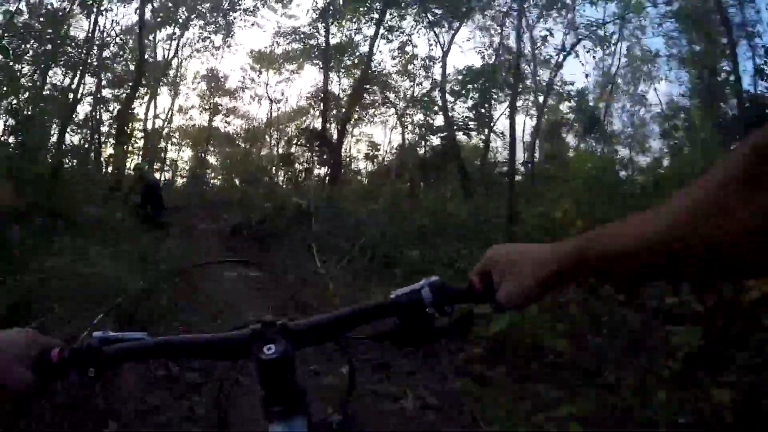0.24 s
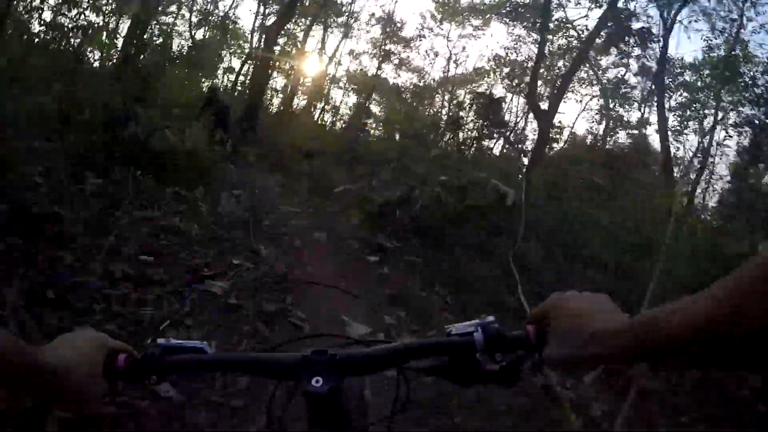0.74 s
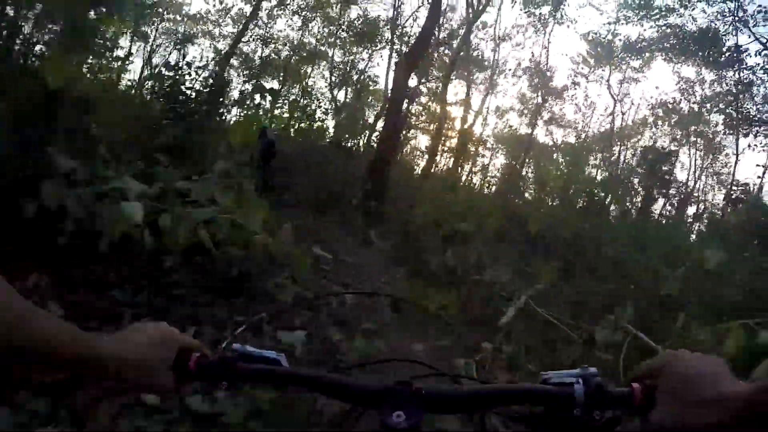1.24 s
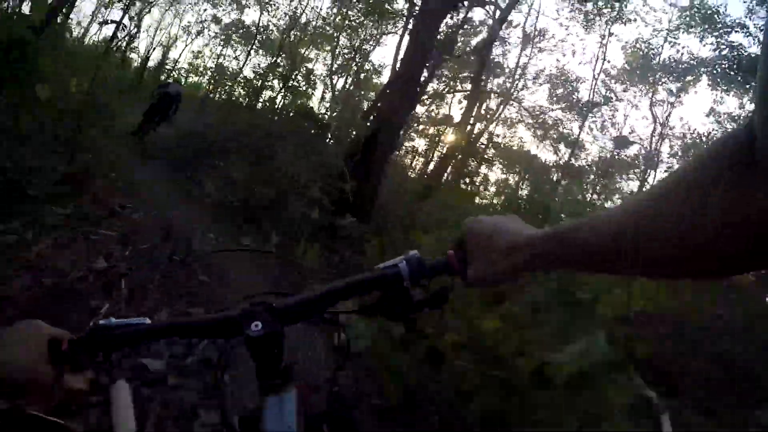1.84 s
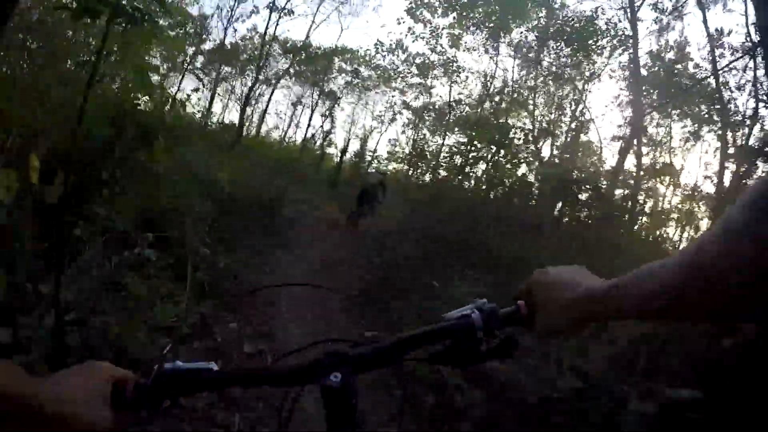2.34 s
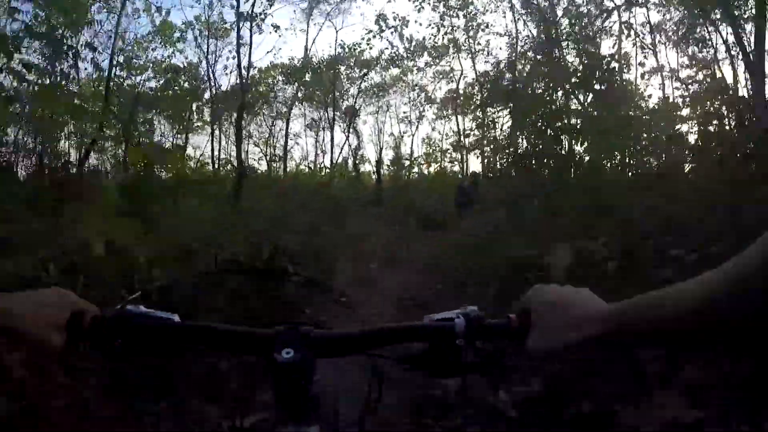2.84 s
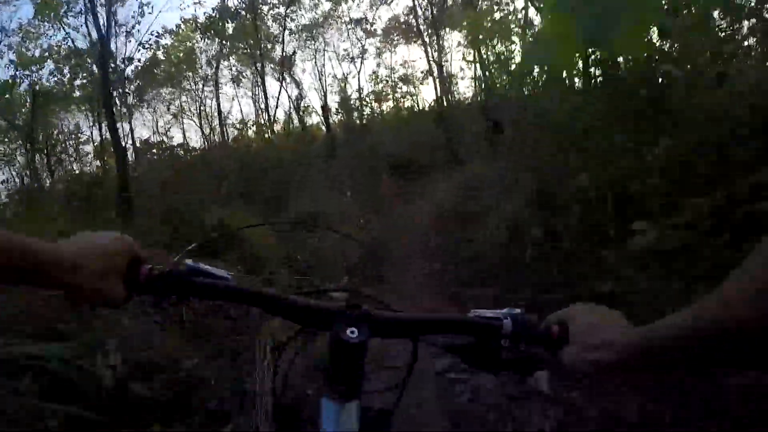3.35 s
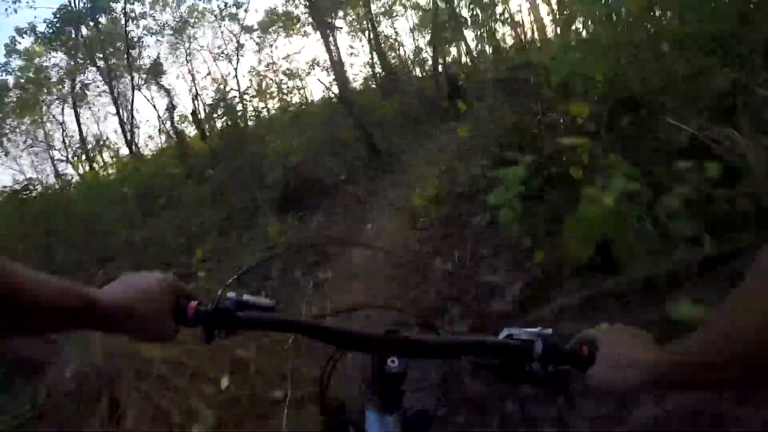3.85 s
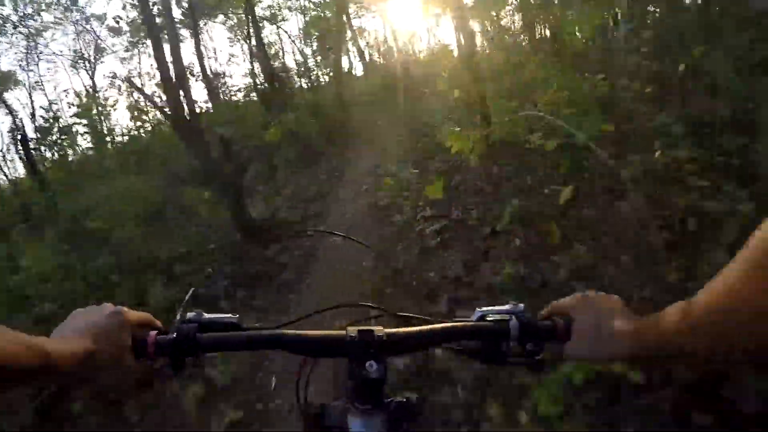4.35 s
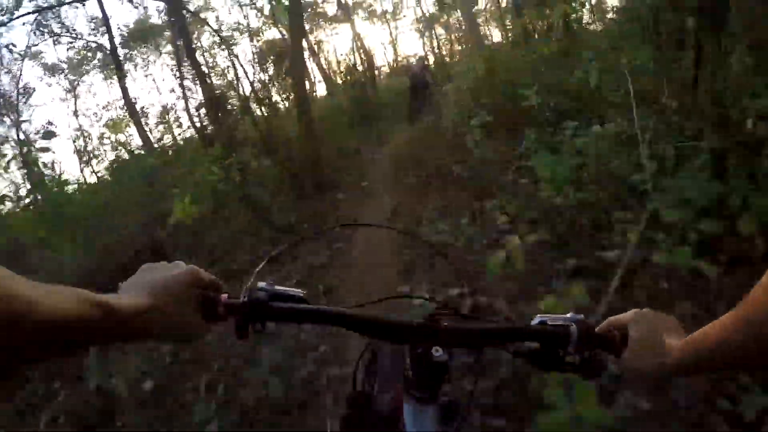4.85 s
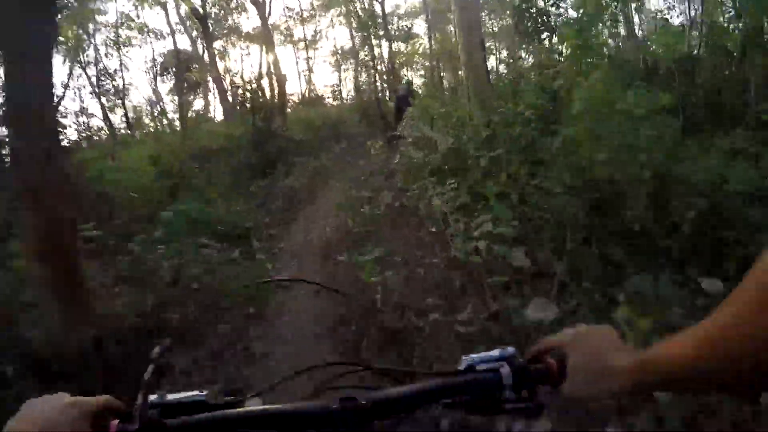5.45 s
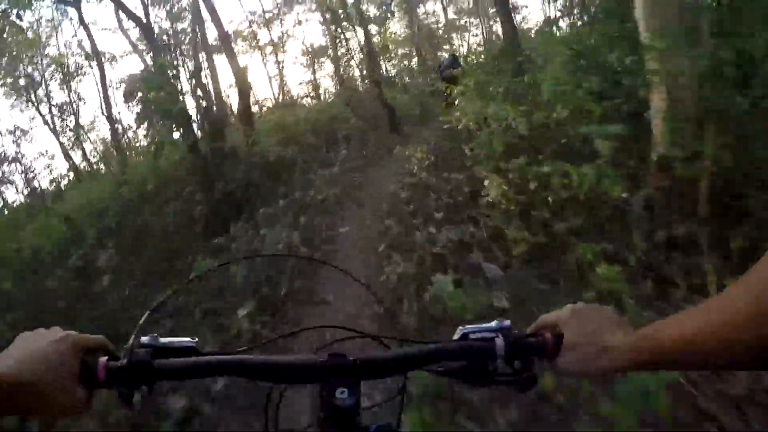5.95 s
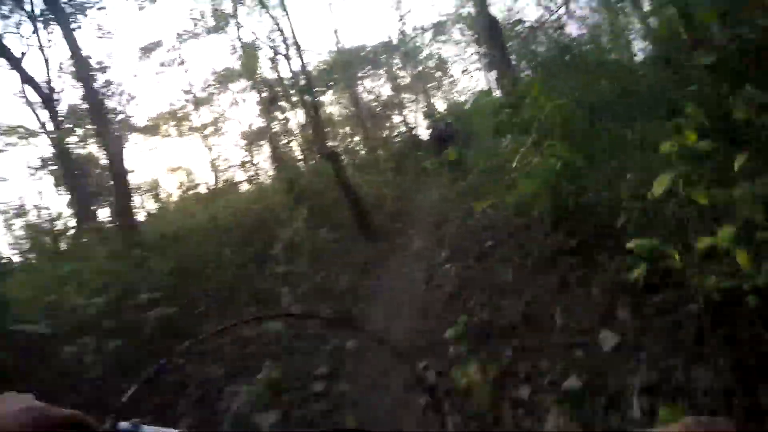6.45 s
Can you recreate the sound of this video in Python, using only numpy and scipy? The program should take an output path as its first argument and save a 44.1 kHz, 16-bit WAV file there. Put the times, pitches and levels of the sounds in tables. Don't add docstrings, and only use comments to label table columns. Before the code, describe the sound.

Close, boxed-in sound of a bike bouncing along a dirt track in open woodland. A shuddering sub-bass rumble runs throughout, broken by short lulls and big low jolts. Over it come dull mount knocks, chain and stone clacks, small taps, and crackly bursts of leaves and twigs, densest before two seconds and near four. Fainter dirt crunch, chain whir and a thin rush of air sit behind.

```python
import sys
import numpy as np
from scipy import signal
from scipy.fft import irfft
from scipy.io import wavfile
from scipy.ndimage import uniform_filter1d

SR = 44100
rng = np.random.default_rng(int(sys.argv[2]) if len(sys.argv) > 2 else 0)


def inscribe(sig):
    pcm = np.round(np.clip(np.atleast_2d(sig).T, -1, 1) * 32767)
    wavfile.write(sys.argv[1], SR, pcm.astype(np.int16))


def nominal_scale(level):
    x = np.asarray(level, float) / 20
    return 10 ** x


N = 295029

# centre_hz, width_hz, lift_db
CASE_MODES = [(507, 440, -1), (719, 75, 0.5), (1333, 118, 3), (1910, 300, 6.5), (2634, 440, 4.5),
              (3350, 390, 4), (3908, 205, 4.5), (4970, 220, -2), (7450, 670, 5.5), (9400, 280, 4),
              (10300, 190, 1.5), (13400, 520, 4.5), (2264, 428, -7.5), (6100, 310, 0.5)]


def evened(x):
    return x / np.sqrt(np.mean(x ** 2) + 1e-20)


def curves(rows):
    s, *columns = np.transpose(rows)
    return [np.interp(np.arange(N) / SR, s, column) for column in columns]


def humps(rows):
    t = np.arange(N) / SR
    return np.max([db * np.maximum(1 - abs(t - s) / half, 0) for s, db, half in rows], axis=0)


def read(points, hz):
    f, db = np.transpose(points)
    return np.interp(np.log(hz + 1), np.log(f + 1), db, -90, -90)


def causal(db):
    log_gain = np.log(nominal_scale(np.concatenate([db, db[-2:0:-1]])))
    minimum_phase = np.exp(np.conj(signal.hilbert(log_gain)))
    return irfft(minimum_phase[:len(db)])[:len(db)]


def coloured(x, points, size=4096):
    taps = causal(read(points, np.fft.rfftfreq(size, 1 / SR)))
    return evened(signal.oaconvolve(x, taps)[:len(x)])


def band(x, lo_hz, hi_hz):
    sos = signal.butter(3, [lo_hz, hi_hz], "band", fs=SR, output="sos")
    return evened(signal.sosfilt(sos, x))


def flicker(per_s, depth_db):
    steps = rng.standard_normal(4000)
    return nominal_scale(depth_db * np.interp(np.arange(N) / SR * per_s, np.arange(4000), steps))


def grit(per_s, grain_s, bed):
    happens = rng.random(N) < per_s / SR
    size = nominal_scale(4.5 * np.minimum(rng.exponential(1, N), 3)) * happens
    puffs = signal.lfilter([1], [1, -np.exp(-1 / (grain_s * SR))], size)
    return (bed + evened(puffs)) * rng.standard_normal(N)


def patchy(x, depth_db):
    z = signal.stft(x, nperseg=256, noverlap=192)[2]
    patches = uniform_filter1d(rng.standard_normal(z.shape), size=3, axis=0)
    patches = uniform_filter1d(patches, size=10, axis=1)
    return evened(signal.istft(z * nominal_scale(depth_db * evened(patches)), nperseg=256, noverlap=192)[1][:N])


def add(mix, s, sound):
    part = mix[round(s * SR):][:len(sound)]
    part += sound[:len(part)]


def shaking():
    # frequency_hz, level_db (per Hz)
    rumble_spectrum = [(4.7, -18.5), (8.0, 4), (22, 7), (36, -2.5), (50, -17.5), (120, -25), (160, -28),
                       (260, -120)]
    # frequency_hz, level_db (per Hz)
    buffet_spectrum = [(29, -30), (50, -1), (226, -23.5), (372, -34), (600, -39), (780, -81), (1320, -120)]
    # centre_s, depth_db, half_length_s
    lulls = [(0.0, 35, 0.077), (0.11, 19.5, 0.074), (0.39, 14, 0.21), (0.89, 18, 0.053), (1.25, 9, 0.29),
             (1.49, 11, 0.044), (2.03, 18, 0.085), (0.97, 4, 0.054), (2.12, 12, .08), (2.22, 11, 0.15),
             (2.4, 11, 0.07), (2.6, 6, 0.18), (3.06, 8, 0.067), (3.2, 9, 0.067), (3.48, 4, 0.07),
             (4.04, 13, 0.073), (4.4, 5.5, 0.76), (4.77, 11.5, 0.23), (5.0, 11.5, 0.092), (5.37, 7, 0.23),
             (6.0, 24, 0.043), (6.17, 13.5, 0.16), (6.28, 6, 0.065), (6.45, 6, 0.35)]
    # centre_s, lift_db, half_length_s
    ruts = [(0.0, 14, 0.035), (0.27, 7, 0.072), (0.61, 9.5, 0.096), (0.8, 10, 0.074), (1.4, 7, 0.15),
            (1.79, 15, 0.062), (1.93, 4, 0.048), (2.45, 19, 0.071), (2.62, 15, 0.071), (2.8, 10.5, 0.15),
            (3.23, 7, 0.033), (3.35, 11, 0.048), (3.58, 12, 0.13), (3.88, 17, 0.071), (4.08, 12.5, 0.14),
            (4.58, 8, 0.36), (4.81, 9.5, 0.13), (5.2, 7, 0.51), (5.52, 6, 0.18), (6.17, 10, 0.069),
            (6.32, 5, 0.044), (6.45, 8, .12), (6.62, 9.5, 0.1)]
    deep = coloured(rng.standard_normal(N), rumble_spectrum, size=32768)
    deep /= np.sqrt(uniform_filter1d(deep ** 2, 5000) + 0.039)
    buffet = coloured(rng.standard_normal(N) * flicker(25, 4.43), buffet_spectrum, size=16384)
    sink_db = humps(lulls)
    rumble_db = -23.5 - sink_db
    buffet_db = -43.5 + humps(ruts) - 0.15 * sink_db
    return nominal_scale(rumble_db) * evened(deep) + nominal_scale(buffet_db) * buffet


def pedalling():
    # start_s, end_s, whir_db, run_up_s, run_down_s
    pedals = [
        (0.46, 2.27, -54, .04, 0.21),
        (3.43, 6.03, -52.5, 0.24, 0.06),
    ]
    t, coast_db = np.arange(N) / SR, -75
    spells = [np.interp(t, [start - up, start, end, end + down], [coast_db, db, db, coast_db])
              for start, end, db, up, down in pedals]
    return np.max(spells, axis=0)


def rolling():
    # time_s, dirt_db, leaves_db
    ride = [(0.0, -52.5, -50), (0.39, -57, -54), (0.67, -57, -47), (0.9, -43.5, -47.5),
            (1.17, -54.5, -55.5), (1.43, -50.5, -43.5), (1.77, -51, -37), (2.2, -55, -48), (2.46, -49, -46),
            (2.6, -53, -51), (3.13, -51.5, -53), (3.35, -46.5, -48.5), (3.7, -47, -38.5), (4.1, -51, -44.5),
            (5.22, -51.5, -45), (5.85, -55.5, -48.5), (6.22, -54, -49), (6.6, -50.5, -46.5)]
    # frequency_hz, level_db
    dirt_spectrum = [(250, 3.5), (400, -6.5), (800, -1), (1500, 0.5), (2100, -1.5), (2600, -7), (5000, -36)]
    # frequency_hz, level_db
    leaf_spectrum = [(1200, -22), (1800, 2.5), (2500, 3), (4150, 8), (4600, -25), (6500, -10),
                     (10000, -12.5), (15300, -27)]
    # frequency_hz, level_db
    whir_spectrum = [(1900, -41), (2500, 7), (4200, 3.5), (4900, -7.5), (6100, -12.5), (7400, -11.5),
                     (8400, -11), (10400, -6.5), (13300, -10.5), (15300, -6.5)]
    dirt_db, leaves_db = curves(ride)
    dirt = patchy(coloured(grit(200, 0.003, 2.6) * flicker(30, 1.5), dirt_spectrum), 2.4)
    leaves = patchy(coloured(grit(350, 0.002, 2.0) * flicker(40, 1.6), leaf_spectrum), 2.3)
    whir = coloured(grit(830, 0.00094, 2.0) * flicker(13, 0.99), whir_spectrum)
    whir_db = pedalling() + 0.088 * (leaves_db - leaves_db.mean())
    return nominal_scale(dirt_db + 0.5) * dirt + nominal_scale(leaves_db - 7.5) * leaves + nominal_scale(whir_db) * whir


def rushing_air():
    # frequency_hz, level_db
    air_spectrum = [(3000, 5), (5000, 6), (9000, -11), (12500, -3.5), (15200, -20)]
    return nominal_scale(-66) * coloured(rng.standard_normal(N), air_spectrum)


def brushes():
    # start_s, peak_db, dull_db (under the peak), length_s
    soft_passes = [(2.72, -27.5, -22, 0.01), (0.725, -31, -21, .0075), (1.529, -28.5, -15, 0.025),
                   (1.583, -25.5, -15, 0.022), (1.7456, -27, -9.5, 0.08), (1.837, -29, -15.5, 0.033),
                   (1.944, -26.5, -10.5, 0.022), (2.03, -23, -26, 0.033), (5.265, -47.5, 7, 0.026),
                   (3.6267, -24, -33, 0.039), (3.687, -23.5, -14, 0.02), (3.751, -28.5, -17, 0.023),
                   (3.8, -24, -18, 0.04), (3.865, -20.5, -31, 0.018), (3.8957, -21.5, -31, 0.034),
                   (3.959, -23.5, -28, 0.041), (4.644, -41, 6, 0.0068), (4.7014, -20, -19, 0.011),
                   (4.73, -20.5, -19.5, 0.029), (5.0955, -27, -27, 0.016), (5.142, -31.5, -30, 0.035),
                   (5.868, -46, 6, 0.0074), (6.433, -51, 10, 0.18), (0.874, -46, 5.5, 0.095),
                   (1.771, -28.5, -12, 0.072), (6.16, -41.5, 2, 0.067), (6.644, -50, -12, 0.033)]
    # start_s, peak_db, dull_db (under the peak), length_s
    twig_sweeps = [(0.1239, -33.5, -18, 0.047), (0.337, -36, -12, 0.044), (1.112, -32.5, -18, 0.07),
                   (1.146, -35, -9, 0.04), (1.993, -32, -7.5, 0.025), (2.307, -21.5, -13, 0.014),
                   (2.419, -25, -5.5, 0.014), (5.067, -15.5, -19, .013), (5.324, -22.5, -19, 0.0067),
                   (3.4269, -27, -15, 0.074), (3.4486, -22, -13, 0.034), (5.339, -15.5, -21.5, 0.0077),
                   (6.136, -43, -7, 0.021), (6.552, -18.5, -37, 0.0084), (6.563, -25.5, -25, 0.022),
                   (6.584, -25.5, -35, 0.022)]
    out, t = np.zeros(N), np.arange(6000) / SR
    rows = [(*r, -19) for r in soft_passes] + [(*r, -12) for r in twig_sweeps]
    noise = rng.standard_normal((len(rows), 4, len(t)))
    dull = band(noise[:, 0], 850, 2520)
    mid = band(noise[:, 1], 2890, 4710)
    fizz = band(noise[:, 2], 3200, 12800)
    clumps = nominal_scale(4.0 * evened(uniform_filter1d(noise[:, 3], 130)))
    for (s, db, dull_db, length, fizz_db), d, m, f, clump in zip(rows, dull, mid, fizz, clumps):
        hold = (1 - np.exp(-t / 0.00061)) * np.exp(-(t / length) ** 3)
        hold *= 1 + 0.46 * np.exp(-t / 0.0027)
        crackle = m + nominal_scale(dull_db + 11.0) * d + nominal_scale(fizz_db + 3) * f
        add(out, s, nominal_scale(db - 19) * hold * clump * crackle)
    return out


def blows():
    # time_s, peak_db, centre_hz, crack_db (under the peak)
    clacks = [(0.146, -23.5, 4240, -11), (1.0258, -10.5, 1640, -21.5), (1.196, -16.5, 1570, -16.5),
              (1.236, -25.5, 1870, -41), (1.38, -23, 980, -14), (1.793, -30, 3410, -22),
              (2.299, -6, 1910, -17), (2.317, -29, 3580, -18), (2.424, -13, 1200, -18),
              (3.591, -19.5, 1770, -20), (3.608, -21, 1900, -36), (3.728, -15.5, 990, -32),
              (4.068, -17, 1210, -30), (4.076, -12, 1860, -33), (4.257, -26.5, 1600, -29),
              (4.507, -33, 528, -0.5), (5.0703, -20, 3680, -3.5), (6.2129, -15.5, 790, -30),
              (6.077, -20, 1550, -40), (6.212, -9.5, 1294, -18)]
    # time_s, peak_db, centre_hz, push_db, crack_db (both under the peak)
    mount_knocks = [(0.315, -13.5, 710, -18.5, -42), (0.76, -13.5, 820, -17.5, -36),
                    (0.79, -29, 750, 1.5, -38), (0.815, -29.5, 557, -10, -14), (2.05, -23, 1200, -21, -34),
                    (2.2995, -11, 836, -18, -38), (2.4254, -20.5, 486, -4.5, -32),
                    (2.403, -19.5, 885, -24, -28), (2.385, -29, 453, -25, -20),
                    (2.462, -25.5, 466, -10.5, -17), (2.798, -10.5, 733, -17.5, -42),
                    (3.046, -17.5, 1030, -22, -29), (3.517, -28, 530, -20, -7),
                    (3.837, -10.5, 1055, -21.5, -29), (3.881, -33, 690, 3, -14),
                    (4.384, -17.5, 630, -18, -25), (4.668, -13.5, 1000, -21.5, -18.5),
                    (4.795, -11, 1120, -24.5, -31), (4.845, -21.5, 800, -6, -18),
                    (5.517, -17, 700, -17, -38), (5.746, -33, 724, -2, -13), (6.153, -16, 1000, -25, -29),
                    (6.385, -27.5, 476, -4, -30)]
    # time_s, peak_db, centre_hz
    taps = [(0.176, -38, 1260), (0.48, -36.5, 2020), (0.42, -36.5, 790), (0.678, -35, 810),
            (1.002, -39, 1350), (2.3, -32.5, 730), (2.71, -22.5, 437), (2.782, -29, 430),
            (2.889, -37, 1880), (2.612, -31.5, 690), (4.8, -32, 470), (3.333, -28.5, 700),
            (3.3, -27.5, 690), (4.09, -24.5, 604), (0.826, -29, 520), (1.3, -33, 410), (2.908, -37, 1150),
            (2.582, -35, 700), (5.035, -29.5, 810), (3.74, -27, 875), (3.847, -30.5, 700),
            (3.893, -24, 590), (3.912, -30.5, 780), (7.2, -28, 700), (6.53, -31, 540), (6.9, -32, 990),
            (6.422, -30.5, 920), (6.506, -24.5, 1040), (6.666, -26, 470)]
    return ([(s, db, hz, -26.5, crack_db, crack_db - 8) for s, db, hz, crack_db in clacks]
            + [(*row, row[-1] - 44) for row in mount_knocks]
            + [(*row, -12.5, -22, -47) for row in taps])


def knocks():
    out, t = np.zeros(N), np.arange(3000) / SR
    modes_hz = np.array(CASE_MODES)[:7, :1]
    rows = blows()
    noise = rng.standard_normal((len(rows), 2, len(t)))
    luck = rng.standard_normal((len(rows), len(modes_hz), 1))
    cracks, fizzes = band(noise[:, 0], 2500, 4900), band(noise[:, 1], 2900, 11700)
    for (s, db, hz, push_db, crack_db, fizz_db), crack, fizz, u in zip(rows, cracks, fizzes, luck):
        turns = hz * (0.69 * t + 0.0011 * (1 - np.exp(-t / 0.0013)))
        thud = nominal_scale(-60 * t * np.sqrt(hz / 700) / 0.013) * np.sin(2 * np.pi * turns)

        octaves = np.log2(modes_hz / hz)
        share_db = -18.0 - 12.0 * np.maximum(octaves, 0) + 7.5 * np.minimum(octaves, 0) + 4.6 * np.tanh(u)
        decay_db = -60 * t * np.sqrt(modes_hz / 900) / 0.034
        tones = np.sin(2 * np.pi * modes_hz * (1 + 0.042 * u) * t)
        ring = (nominal_scale(share_db) * nominal_scale(decay_db) * tones).sum(axis=0)

        push_turns = 170 * t + 1.3 * (1 - np.exp(-t / 0.001))
        push = nominal_scale(push_db + 10.5 - 60 * t / 0.032) * np.sin(2 * np.pi * push_turns)

        walls = np.sin(2 * np.pi * modes_hz[4:] * t + 2 * u[4:]).sum(axis=0)
        hiss = nominal_scale(crack_db - 1.5 - 60 * t / 0.02) * (1.17 * crack + 0.18 * walls)
        hiss += nominal_scale(fizz_db + 5.5 - 60 * t / 0.011) * fizz

        onset = 1 - np.exp(-t * (hz + 400) / 0.63)
        add(out, s + 0.001388, nominal_scale(db - 1.5) * onset * (thud + ring + push + hiss))
    return out


def jolts():
    # time_s, peak_db, t60_s
    heavy_bumps = [(0.187, -24, 0.35), (0.237, -15.5, 0.32), (0.582, -12.5, 0.75), (0.769, -17, 0.24),
                   (0.906, -19, 0.23), (1.525, -20, 0.45), (1.746, -16, 1), (1.913, -6, 0.3),
                   (2.051, -16.5, 0.36), (2.422, -14, 0.22), (2.778, -17.5, 0.16), (2.888, -12, 0.24),
                   (3.228, -6, 0.22), (3.547, -14, 0.15), (4.542, -10, 0.23), (5.536, -15.5, 0.37),
                   (5.875, -8, 0.17)]
    # time_s, peak_db, t60_s
    quick_kicks = [(1.018, -24, 0.07), (1.246, -23, 0.12), (1.578, -28, 0.22), (2.239, -21, 0.27),
                   (2.574, -23, 0.35), (2.703, -25.5, 0.076), (3.048, -29.5, 0.11), (4.031, -26, 0.052),
                   (4.223, -22.5, 0.12), (4.886, -19.5, 0.056), (5.186, -32, 0.14), (6.2, -16, 0.15),
                   (0.251, -22.5, 0.073), (3.565, -20.5, 0.071), (0.918, -26, .08), (3.87, -24, 0.087),
                   (4.56, -25, 0.12), (3.7, -29, .15)]
    out, t = np.zeros(N), np.arange(SR // 3) / SR
    rows = [(*r, 43.3) for r in heavy_bumps] + [(*r, 94) for r in quick_kicks]
    for s, db, t60, hz in rows:
        turns = np.cumsum(hz * (0.363 + 0.787 * np.exp(-t * hz / 1.845))) / SR
        swell = (1 - np.exp(-t * hz / 0.54)) ** 2 * nominal_scale(-60 * t / t60)
        add(out, s, nominal_scale(db) * swell / swell.max() * np.sin(2 * np.pi * turns))
    return out


def pings():
    # time_s, peak_db,
    # pitch_hz, t60_s
    wall_touches = [(0.465, -46, 3740, .05), (0.478, -45.5, 2730, 0.095), (0.527, -41, 3770, .04),
                    (0.575, -46, 2700, .03), (0.597, -46, 3950, .08), (0.625, -47, 2730, .04),
                    (0.697, -43, 1500, .03), (0.724, -35, 3380, 0.046), (0.761, -24, 2720, 0.019),
                    (0.915, -42, 2660, .08), (0.948, -35, 2500, .03), (1.027, -20, 2580, 0.013),
                    (1.149, -32, 1914, .04), (1.152, -39.5, 7300, .06), (1.219, -40, 1950, .02),
                    (1.361, -39, 3330, .05), (1.382, -31, 1910, 0.022), (1.383, -41, 5200, .02),
                    (2.325, -40.5, 1910, 0.13), (2.722, -27.5, 2480, 0.032), (2.723, -29.5, 4180, 0.026),
                    (2.723, -50, 7380, 0.04), (3.452, -26.5, 1915, 0.036), (3.466, -30.5, 1950, 0.041),
                    (3.454, -30, 4000, .02), (3.518, -30, 3400, .015), (3.583, -44, 7400, .02),
                    (3.672, -33, 1200, 0.033), (3.691, -31, 3820, .03), (3.745, -40, 7600, .015),
                    (3.747, -37, 1800, .05), (3.762, -30.5, 3450, .02), (3.901, -27, 3405, 0.034),
                    (3.983, -31.5, 1810, 0.028), (3.988, -31, 3410, 0.027), (4.058, -30.5, 3390, .025),
                    (4.636, -33, 1620, .02), (4.767, -43, 8040, .02), (4.9, -32, 3000, .015),
                    (5.0, -35, 1490, .02), (5.069, -26, 3340, 0.043), (5.265, -38, 2010, .08),
                    (5.325, -32, 1960, .03), (5.341, -32, 1990, .03),
                    (0.316, -29, 1500, 0.0073), (0.7612, -28, 1900, .008), (0.791, -34, 1700, 0.0072),
                 (0.8, -39, 904, .06), (0.855, -44, 7400, .01), (1.027, -19.5, 897, 0.012),
                 (1.197, -25, 2830, .008), (1.197, -32, 5180, 0.016), (1.11, -37, 2900, .1),
                 (1.43, -37.5, 794, 0.047), (1.462, -36, 1400, 0.037), (2.3005, -25, 5320, .015),
                 (2.31, -32, 7660, 0.028), (2.318, -33, 3310, .03), (2.427, -28, 3290, .015),
                 (2.799, -25, 1420, 0.0078), (2.799, -30, 2570, 0.0093), (2.888, -38, 1900, 0.028),
                 (2.953, -43, 1800, .02), (3.0, -36, 1500, .02), (3.047, -33, 2000, .008),
                 (3.23, -38, 802, .12), (3.965, -30, 3520, .04), (4.077, -26, 2900, .01),
                 (4.384, -25.5, 1160, 0.02), (4.669, -23, 2090, 0.0099), (4.846, -25, 1520, 0.012),
                 (5.519, -30, 1200, .008), (5.87, -38, 1510, 0.026), (5.96, -38, 1395, .12),
                 (6.066, -47, 8500, .01), (6.13, -46, 6000, .008), (6.163, -46, 7600, .015),
                 (6.079, -27, 2600, 0.0089), (6.3, -39, 3700, .02), (6.33, -41.5, 907, 0.1),
                 (6.44, -38, 698, .2), (6.46, -37, 1200, .2), (6.49, -39, 600, .15), (6.5, -38, 1600, .15),
                 (6.645, -40, 3730, .02), (0.398, -38.5, 547, 0.018), (0.35, -42, 1400, 0.065),
                 (1.54, -36, 1700, .015), (1.749, -32, 1660, .02), (1.979, -32, 1700, .02),
                 (2.093, -34, 1300, .02), (4.45, -35.5, 750, .02), (4.522, -35.5, 700, 0.023),
                 (6.214, -28, 5220, 0.016)]
    rows = wall_touches
    out, t, rough = np.zeros(N), np.arange(5000) / SR, 0.9
    scrape = evened(uniform_filter1d(rng.standard_normal((len(rows), 2, len(t))), size=36))
    for (s, db, hz, t60), (a, b) in zip(rows, scrape):
        turn = 2 * np.pi * hz * t
        tone = (1 + rough * a) * np.sin(turn) + rough * b * np.cos(turn)
        rise_s = 0.00097 + 1.03 * t60 ** 2
        add(out, s, nominal_scale(db - 60 * t / t60) * (1 - np.exp(-t / rise_s)) * tone)
    return out


def case(x):
    hz = np.fft.rfftfreq(4096, 1 / SR)
    lift_db = sum(db / (1 + (2 * (hz - f) / width) ** 2) for f, width, db in CASE_MODES)
    return signal.oaconvolve(x, causal(lift_db - 1.0))[:N]


def scene():
    felt = shaking() + jolts()
    touching = case(brushes())
    heard = case(rolling() + knocks() + touching + rushing_air())
    return (felt + heard + pings())[None]


def band_limit(x):
    return signal.sosfilt(signal.butter(12, 16480, fs=SR, output="sos"), x)


def record(dry):
    steady = signal.sosfilt(signal.butter(1, 6.0, "high", fs=SR, output="sos"), dry)
    steady = signal.sosfilt(signal.cheby2(10, 45, 16300, fs=SR, output="sos"), steady)
    return band_limit(steady)


dry = scene()
out = record(dry)
inscribe(out)
```